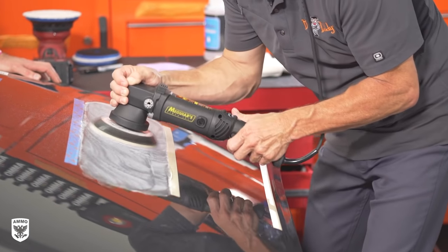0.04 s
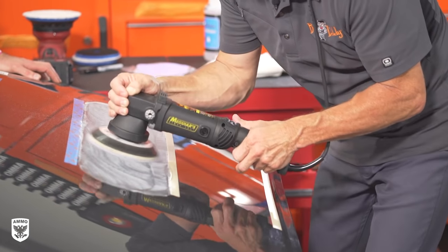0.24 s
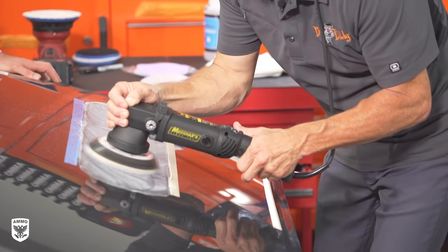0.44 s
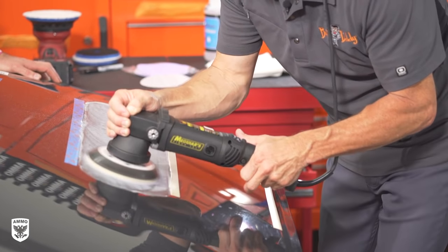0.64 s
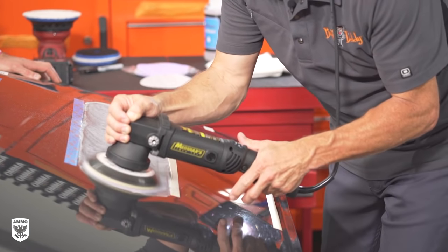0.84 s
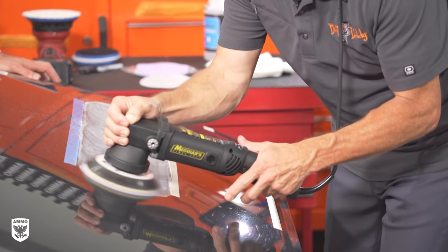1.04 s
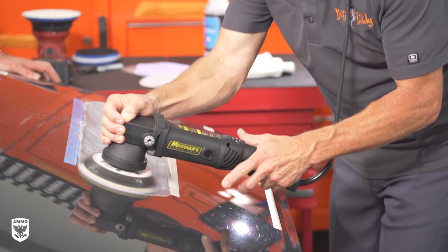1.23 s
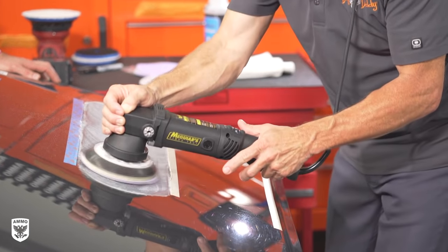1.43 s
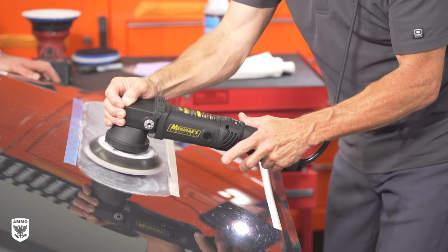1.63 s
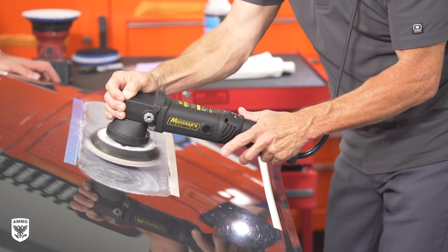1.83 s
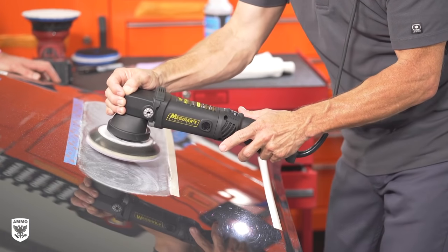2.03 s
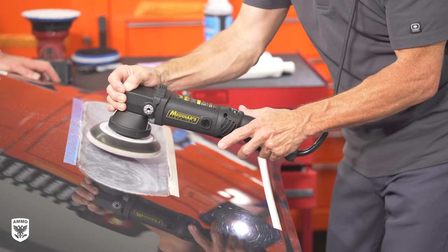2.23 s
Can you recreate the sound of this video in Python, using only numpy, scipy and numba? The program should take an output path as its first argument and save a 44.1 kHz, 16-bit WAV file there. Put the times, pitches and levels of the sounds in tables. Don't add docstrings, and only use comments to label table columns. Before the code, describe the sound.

A handheld orbital polisher with a sanding disc hums and scrubs on a car panel, gears rattling, then slows, dropping in pitch until single knocks remain; heard from about a metre in a hard-walled garage.

```python
import sys
import numpy as np
from scipy import signal
from scipy.fft import rfft, irfft
from scipy.io import wavfile
from scipy.ndimage import uniform_filter1d, map_coordinates
from numba import njit

SR = 44100
rng = np.random.default_rng(int(sys.argv[2]) if len(sys.argv) > 2 else 0)


def invert_db(level):
    return 10 ** (np.asarray(level, dtype=float) / 20)


def store_wav(level_fs):
    pcm = np.round(np.clip(np.atleast_2d(level_fs), -1, 1) * 32767)
    wavfile.write(sys.argv[1], SR, pcm.T.astype(np.int16))


N = 100239

# start_s, orbit_rate_hz
ORBIT_SPEED = [(0, 72), (.3, 70.7), (.79, 70.2), (.876, 66.5), (.984, 62.6), (1.2, 56.33), (1.41, 50.3),
               (1.625, 44.85), (1.84, 39.6), (2.05, 34.66), (2.27, 29.6)]
# start_s, first_db, second_db, third_db, fourth_db
PANEL_HUM = [(0, -35.5, -24.5, -34.5, -55), (.15, -30.5, -26.5, -36, -39), (.33, -38, -21, -34.5, -48.5),
             (.42, -21, -25, -37.5, -39), (.48, -23.5, -30, -42.5, -43.5), (.56, -25.5, -25, -31.5, -43),
             (.68, -35.5, -21.5, -40, -42.5), (.8, -30, -22.5, -66, -42), (.88, -31.5, -33, -60, -62),
             (.98, -37, -33.5, -38.5, -38.5), (1.1, -33, -29.5, -46, -37), (1.16, -42, -36.5, -34, -41),
             (1.21, -36.5, -66, -58, -58), (1.27, -30, -35.5, -38.5, -41), (1.36, -36, -47, -78.5, -46),
             (1.43, -48, -51, -62, -55)]
# start_s, pad_pressure_db, gear_rattle_db, rattle_ring_hz, fan_db
LOAD = [(0, -29.5, -35.5, 2960, -44), (.2, -30, -37.5, 2980, -45), (.35, -30, -31, 2940, -44.5),
        (.5, -29, -32, 2924, -44), (.75, -30.5, -35.5, 2990, -44), (.85, -32.5, -35.5, 2840, -47.5),
        (.95, -32, -46, 2640, -48), (1.1, -35, -40.5, 2350, -50), (1.2, -36.5, -39.5, 2200, -55),
        (1.35, -38.5, -47, 2000, -61), (1.55, -40.5, -70, 2130, -60.5), (1.9, -49, -51, 2180, -53.5),
        (2.27, -93, -74, 2230, -56.5)]
# pitch_hz, level_db
PAD_COLOUR = [(140, -5), (240, -2.5), (277, -4), (313, -8.5), (666, 0.5), (973, -7), (1260, -10),
              (1520, -18.5), (2300, -19.5), (2990, -48), (5060, -120)]
# pitch_hz, level_db
GRIT_COLOUR = [(1350, -55), (2300, -43), (2830, 3), (3310, -5), (3740, -1.5), (5610, -3), (6500, -14.5),
               (8160, -11), (10000, -66), (13000, -59), (22000, -120)]
# pitch_hz, level_db
FAN_COLOUR = [(5590, -33), (9300, 6), (10100, 0), (11000, 7.5), (12300, 8), (13300, 8.5), (14100, -10),
              (15100, 4), (20000, 3)]
# pitch_hz, level_db
RUSH_COLOUR = [(15, -38), (25, 5), (65, 6), (222, -8.5), (681, 5.5), (800, -5.5), (1190, 1), (1890, -3.5),
               (3000, -4), (3900, -0.5), (6600, -120)]
# pitch_hz, level_db
RUSH_TOP_COLOUR = [(1760, -38), (3000, -11), (3820, -10), (4380, -1), (5200, -8), (6130, -5.5), (8580, -20),
                   (13200, -13.5), (15500, -19.5)]
# pitch_hz, width_hz, level_db
HOUSING_RINGS = [(605, 270, -6.5), (1220, 230, -5), (4350, 660, -7), (5400, 510, -11), (8130, 1340, -12.5)]
# multiple_of_orbit_rate, level_db
WHINE_TONES = [(74.7, -4), (87.3, -3), (91.7, 0), (100.1, 0), (102.6, -3), (107.6, -2), (112.7, -1),
               (114.7, -2), (120.9, -2), (123.4, 1), (127.8, -2), (130.5, -2), (139.3, 0), (140.6, 2),
               (146.4, -3), (155.1, 1), (165.8, -3), (187.3, -3), (194, -5), (202.7, 1), (225.7, -1),
               (243.7, -6), (291.2, -4)]
# start_s, peak_db, pitch_hz
KNOCKS = [(1.12, -22, 2290), (1.144, -18.5, 4600), (1.162, -21, 2400), (1.185, -23.5, 3660),
          (1.197, -18.5, 4420), (1.217, -17.5, 4540), (1.238, -25, 2410), (1.251, -19.5, 3230),
          (1.276, -18, 4200), (1.298, -21, 4300), (1.32, -28, 2880), (1.336, -20.5, 4170),
          (1.364, -26, 2590), (1.388, -20, 4250), (1.427, -21.5, 4300), (1.457, -24.5, 1910),
          (1.493, -22, 1960), (1.508, -22.5, 3030), (1.522, -22, 3640), (1.538, -19.5, 4550),
          (1.557, -19.5, 1700), (1.572, -20.5, 3050), (1.585, -21, 1710), (1.625, -23.5, 1870),
          (1.668, -22, 1820), (1.694, -22, 1680),
          (1.729, -19.5, 1530), (1.777, -20, 1720), (1.797, -27.5, 3120), (1.821, -19.5, 1700),
               (1.838, -21, 3070), (1.853, -21, 4100), (1.907, -19.5, 1240), (1.923, -21, 5900),
               (1.937, -22.5, 1290), (1.995, -19.5, 912), (2.013, -27, 1190), (2.026, -20.5, 1200),
               (2.043, -24.5, 1220), (2.061, -26, 4140), (2.112, -27, 1220), (2.138, -27, 1060),
               (2.153, -26, 1150), (2.204, -24, 1190), (2.228, -29, 1200), (2.237, -20.5, 1220),
               (2.262, -24, 4500)]
# start_s, peak_db, pitch_hz
SNAPS = [
    (0.52, -17, 3000),
    (0.7347, -18.5, 3430),
    (0.003, -9.5, 1150),
    (0.074, -14.5, 1120),
    (0.143, -16, 1150),
]
# start_s, strength_db
BLOWS = [(0.0026, -23), (0.0151, -21), (0.0322, -19), (0.0487, -22), (0.0588, -23), (0.075, -20.5),
         (0.0853, -19.5), (0.0916, -24), (0.0988, -21.0), (0.1149, -20.5), (0.127, -19.5), (0.1437, -22),
         (0.1555, -20.5), (0.1675, -19.5), (0.176, -23.0), (0.1869, -23), (0.1987, -18), (0.2104, -21),
         (0.2236, -20.5), (0.237, -19.5), (0.2477, -22.0), (0.2578, -20), (0.2685, -20), (0.2807, -21.5),
         (0.2925, -20.0), (0.2992, -29), (0.3078, -22.0), (0.32, -18.5), (0.3255, -26), (0.3343, -23),
         (0.3483, -20), (0.3636, -22), (0.37, -37), (0.379, -21), (0.39, -21.5), (0.4026, -24),
         (0.4169, -23.5), (0.4238, -26), (0.4381, -21), (0.445, -26), (0.451, -21.0), (0.4641, -28),
         (0.4765, -24.5), (0.4847, -23), (0.493, -27), (0.5077, -19), (0.521, -26), (0.5266, -21.5),
         (0.535, -28), (0.55, -20), (0.5569, -23.0), (0.5642, -24), (0.576, -21.5), (0.59, -21.5),
         (0.6034, -22), (0.6108, -26), (0.6196, -26), (0.627, -25.0), (0.6357, -27), (0.6442, -22),
                 (0.6517, -30), (0.6587, -21), (0.671, -22), (0.6821, -24), (0.6918, -22), (0.702, -24),
                 (0.713, -32), (0.7202, -25), (0.7281, -26), (0.7353, -21), (0.7473, -26), (0.7625, -25),
                 (0.77, -29), (0.7849, -27.0), (0.7922, -25), (0.8047, -29.5), (0.8247, -32),
                 (0.851, -24.5), (0.8603, -21.5), (0.8781, -25), (0.8986, -22.5), (0.915, -27.0),
                 (0.9326, -23), (0.942, -38), (0.9492, -29), (0.966, -28.0), (0.9752, -40), (0.9855, -28),
                 (1.0062, -30.0), (1.0233, -25), (1.0387, -26.5), (1.053, -32), (1.06, -26), (1.067, -32),
                 (1.0765, -28), (1.0896, -28.5), (1.103, -30.5), (1.1083, -34)]


def unit(x):
    return x / np.sqrt(np.mean(x ** 2))


def curve(table, col):
    table = np.array(table, float)
    return np.interp(np.arange(N) / SR, table[:, 0], table[:, col])


@njit
def moving_bandpass(x, hz, width):
    y, band, low = np.empty(len(x)), 0., 0.
    for i in range(len(x)):
        g = np.tan(np.pi * hz[i] / SR)
        damping = width[i] / hz[i]
        v = (band + g * (x[i] - low)) / (1 + g * (g + damping))
        low += 2 * g * v
        band = 2 * v - band
        y[i] = damping * v
    return y


def ring(x, hz, width):
    return moving_bandpass(x + 1e-18, hz + np.zeros(len(x)), width + np.zeros(len(x)))


def walk(rate):
    k = int(SR / rate)
    steps = np.repeat(rng.standard_normal(N // k + 1), k)
    return 1.17 * uniform_filter1d(uniform_filter1d(steps, k), k)[:N]


def colour(x, table):
    hz, db = np.array(table, float).T
    log_hz = np.log(np.arange(N // 2 + 1) * SR / N + 1)
    gain = invert_db(np.interp(log_hz, np.log(hz), db, left=-99, right=-99))
    return unit(irfft(rfft(x) * gain, N))


def bursts(at, size, ms):
    sample = np.clip((at * SR).astype(int), 0, N - 1)
    return signal.lfilter([1], [1, -np.exp(-1000 / (ms * SR))], np.bincount(sample, size, N))


def grain(spread_db):
    return rng.standard_normal(N) * invert_db(spread_db * walk(400))


def pad(turns):
    swing = np.cos(2 * np.pi * (turns - .4))
    pressure_db = curve(LOAD, 1)
    scrub = colour(grain(1.0) * invert_db(0.43 * swing), PAD_COLOUR)
    scrub = scrub * invert_db(pressure_db + 0.42 * walk(9.5))
    slowed = np.clip((np.arange(N) / SR - 1.3) / 0.26, 0, .9)
    scrub = scrub - slowed * ring(scrub, 203, 400)
    grit = colour(grain(1.5) * invert_db(0.86 * swing), GRIT_COLOUR)
    return scrub + grit * invert_db(pressure_db - 8.5)


def hum(turns):
    t, phase = np.arange(N) / SR, 2 * np.pi * (turns - .401)
    fade = np.clip((1.76 - t) / 0.57, 0, 1)
    panel = 0
    for k in (1, 2, 3, 4):
        level = invert_db(curve(PANEL_HUM, k) + 0.74 * walk(30.3))
        drift = (0.3 + 0.35 * k) * walk(9.43)
        panel = panel - level * np.cos(k * phase + drift)
    mains = invert_db(-59) * np.sin(2 * np.pi * 60.3 * t)
    wobble = invert_db(-65) * (1 - fade) * np.sin(2 * np.pi * turns)
    return np.sqrt(2) * (fade * panel + mains + wobble)


def rattle(turns):
    k = np.arange(int(2 * turns[-1]))
    late, uneven = rng.standard_normal((2, len(k)))
    blow_s, blow_db = np.array(BLOWS).T
    chatter_s = np.interp(k / 2 + 0.15 * late, turns, np.arange(N) / SR)
    load_db, ring_hz = curve(LOAD, 2), curve(LOAD, 3)
    chatter_db = -30 + 3.5 * uneven + load_db[(chatter_s * SR).astype(int)] - load_db[0]
    at = np.r_[blow_s, chatter_s]
    size = invert_db(np.r_[blow_db, chatter_db])
    scrape = uniform_filter1d(bursts(at, size, 2.1), size=40) * rng.standard_normal(N)
    blows = scrape + 6 * bursts(at, size, 0.033)
    main = ring(blows, ring_hz, 380 + 0.51 * np.abs(2950 - ring_hz))
    main = unit(ring(main, ring_hz, 440))
    upper = ring(blows, 3270 + 90 * walk(14.2), 260)
    upper = invert_db(-2) * unit(ring(upper, 3210, 490))
    out = main + upper
    for hz, width, db in HOUSING_RINGS:
        part = unit(ring(ring(blows, hz, width), hz, 0.91 * width))
        out = out + invert_db(db + 1.7 * walk(40.2)) * part
    return invert_db(-36.5) * out


def knocks():
    size = 2048
    out, t = np.zeros(N + size), np.arange(size) / SR
    housing_hz = curve(LOAD, 3)
    for s, db, hz in [*KNOCKS, *SNAPS]:
        i = int(s * SR)
        click = (t < 1 / SR) * (8 if s > 1.44 else 4)
        decay = np.exp(-1000 * t / 2.6) * np.minimum(t / 0.00045, 1)
        blow = click - rng.standard_normal(size) * decay

        def twice(f, width):
            return ring(ring(blow, f, width), f, 2 * width)

        body = twice(1194, 400) - 0.5 * twice(3290, 700) + 0.59 * twice(1775, 880)
        body = unit(body + 0.27 * twice(housing_hz[i], 350))
        tick = unit(twice(5240, 2400))
        hit = unit(twice(hz, .07 * hz + 220)) + invert_db(-1) * body + invert_db(-12) * tick
        out[i:i + size] += invert_db(db - 2.5) * hit / np.abs(hit).max()
    return out[:N]


def fan():
    pace = np.sqrt(curve(ORBIT_SPEED, 1) / ORBIT_SPEED[1][1])
    hiss = map_coordinates(colour(grain(2.8), FAN_COLOUR), [np.cumsum(pace)], mode="mirror")
    return invert_db(curve(LOAD, 4)) * hiss


def whine(turns):
    hz, housing_db = np.array(RUSH_TOP_COLOUR, float).T
    t, speed = np.arange(N) / SR, curve(ORBIT_SPEED, 1)
    level = -52 - 4 * (t - 2) + 9 * np.clip(t - 1.15, -.6, 0)
    out = 0
    for multiple, db in WHINE_TONES:
        through_db = 0.93 * np.interp(np.log(multiple * speed), np.log(hz), housing_db)
        tone = np.sin(2 * np.pi * (multiple * turns + rng.random()))
        out = out + invert_db(level + db + 2.0 * walk(20) + through_db) * tone
    return out


def coasting_rush():
    low = colour(grain(1.0), RUSH_COLOUR)
    low = low + 0.95 * ring(low, 692, 83)
    rush = invert_db(-46) * low + invert_db(-50.5) * colour(grain(1.6), RUSH_TOP_COLOUR)
    return rush * invert_db(-5 * (np.maximum(np.arange(N) / SR, 1.3) - 2))


def garage(hits):
    tail = rng.standard_normal(8000) * np.exp(-np.arange(8000) / SR * np.log(1000) / 0.12)
    return invert_db(-12) * signal.fftconvolve(hits, tail / np.sqrt(np.sum(tail ** 2)))[:N]


def scene():
    turns = np.cumsum(curve(ORBIT_SPEED, 1)) / SR
    hits = rattle(turns) + knocks()
    motor = fan() + whine(turns) + coasting_rush()
    return (pad(turns) + hum(turns) + hits + motor + garage(hits))[None]


def band_limit(x):
    return signal.sosfilt(signal.butter(12, 15640, fs=SR, output="sos"), x)


def record(dry):
    return band_limit(dry)


dry = scene()
out = record(dry)
store_wav(out)
```